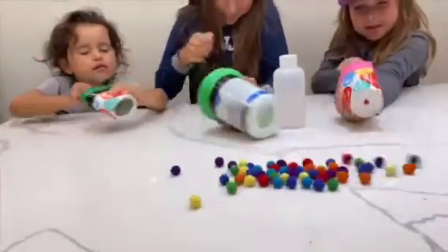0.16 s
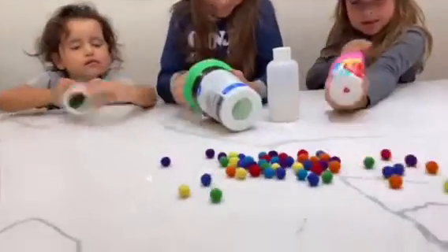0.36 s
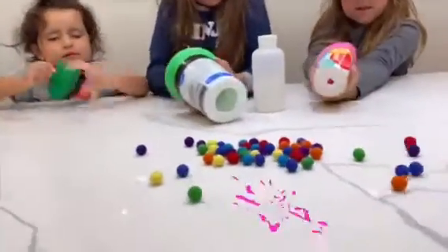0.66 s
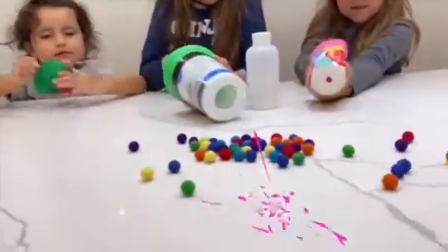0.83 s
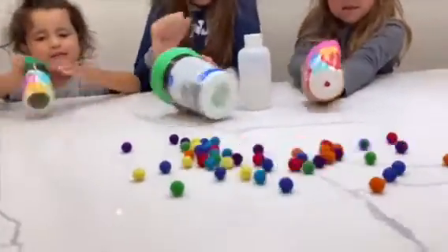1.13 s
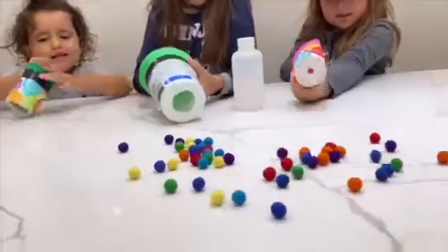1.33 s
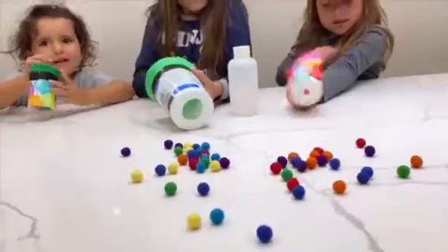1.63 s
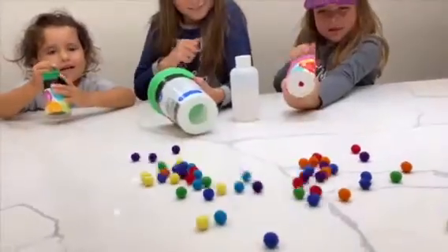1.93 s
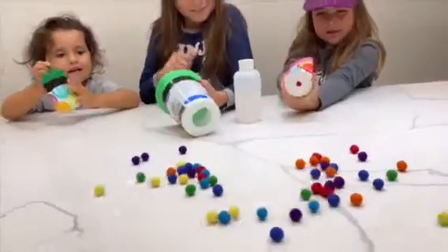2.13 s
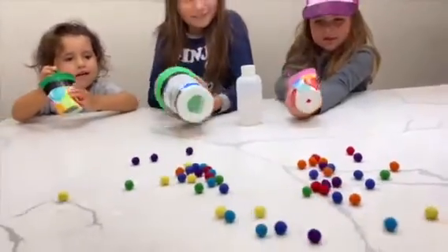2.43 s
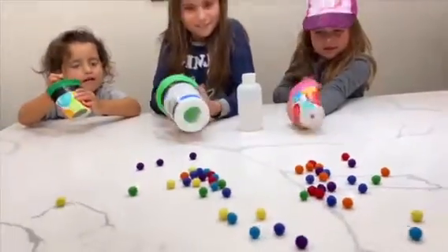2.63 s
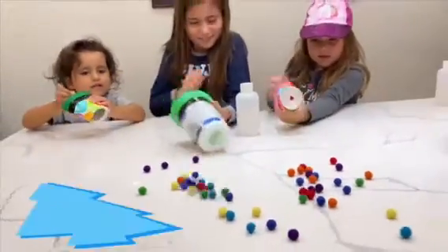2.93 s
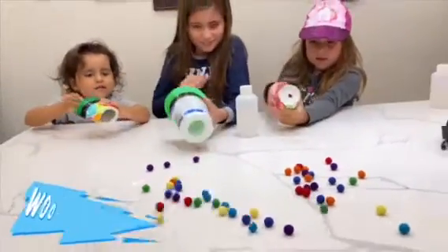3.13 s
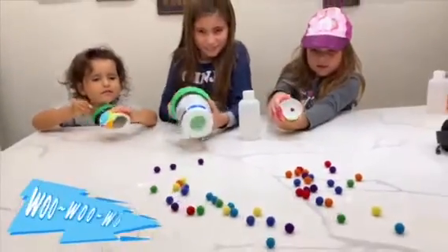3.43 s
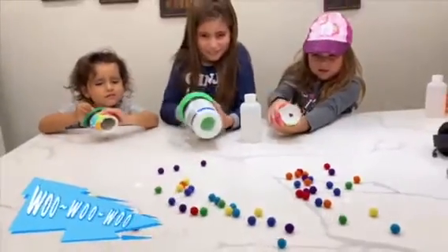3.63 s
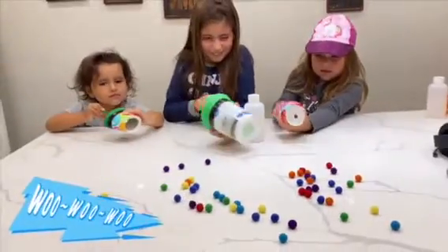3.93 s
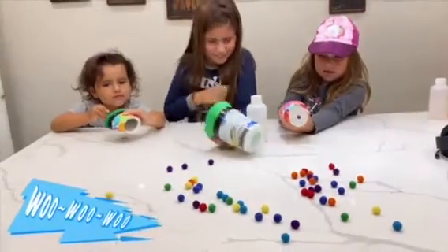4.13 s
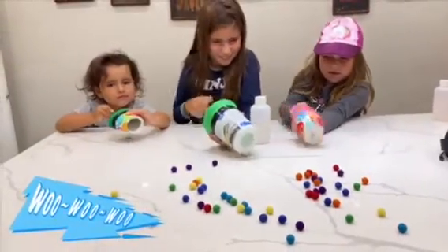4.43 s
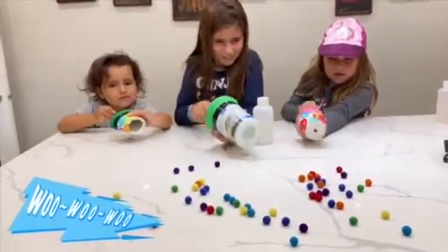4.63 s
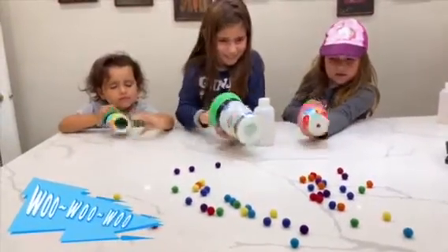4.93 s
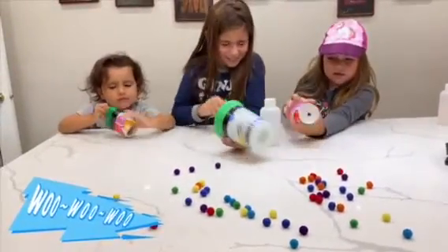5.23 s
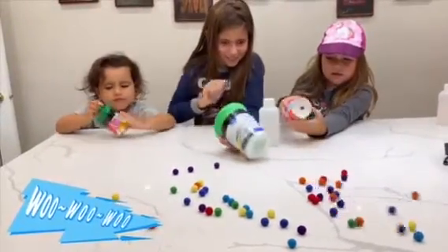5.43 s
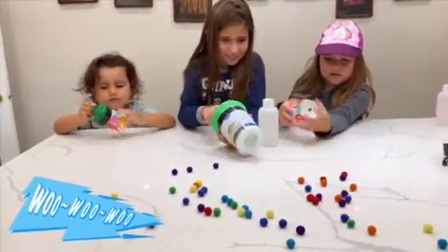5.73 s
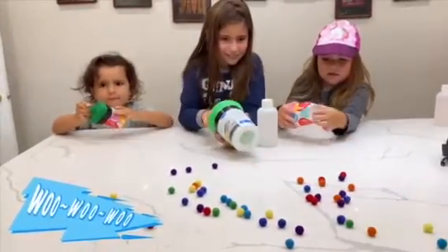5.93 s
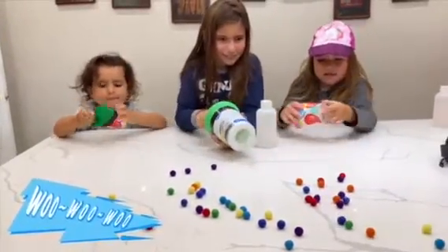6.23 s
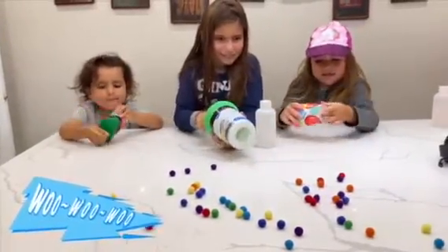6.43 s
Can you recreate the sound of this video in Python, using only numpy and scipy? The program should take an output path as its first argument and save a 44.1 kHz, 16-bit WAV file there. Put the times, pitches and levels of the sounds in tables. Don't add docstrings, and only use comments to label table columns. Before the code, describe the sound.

Close, slightly overloaded phone pickup in a reverberant kitchen with a low steady hum. The tail of a jar snap opens, then a dull cup snap at 0.15 s and a softer one at 0.3, followed by cup knocks and a rubbery grip. The big jar, towards the left, slaps with a hollow pop and table thump at 0.9, 1.7, 2.8 (lowest), 4.0 (loudest) and 5.15 s (highest, thinner). Tighter cup snaps fall at 1.5, bright, and 2.5, loud; a slack, muffled pull at 3.8; a soft full one at 4.35 and a loud one at 4.6. Finger flicks and faint rubber rustle sit between, with a stronger flick at 4.7. Cups clatter on stone from 4.8 to 5.1. After the last snap, ringing fades in about half a second, leaving small flicks, rustles and a light knock at 6.3.

```python
import sys
import numpy as np
from scipy import signal
from scipy.fft import rfft, irfft, next_fast_len
from scipy.io import wavfile
from scipy.ndimage import uniform_filter1d

SR = 44100
rng = np.random.default_rng(int(sys.argv[2]) if len(sys.argv) > 2 else 0)


def wav_out(sig):
    wavfile.write(sys.argv[1], SR, np.round(np.clip(np.atleast_2d(sig).T, -1, 1) * 32767).astype(np.int16))


def gain_from_db(level_db):
    decades = np.asarray(level_db, float) / 20
    return 10 ** decades


N = 289880
LEAD = 4096

# (time [s], peak level [dB], air ring [Hz], crack [dB], belly [dB])
JAR_SNAPS = [
    (0.908, 1, 425, -13, -10),
    (1.712, 2, 457, -14.5, -12),
    (2.805, 2.5, 356, -12.5, -11),
    (3.962, 4, 611, -13.5, -13.5),
    (5.153, 2.5, 790, -12.5, -17),
]
# (time [s], peak level [dB], air ring [Hz], crack [dB], belly [dB])
CUP_SNAPS = [
    (0.145, -2.5, 545, -38, -23),
    (0.325, -11, 875, -57, -7.5),
    (1.532, -4, 832, -6, -11),
    (2.505, -0.5, 714, -14.5, -26),
    (4.344, -14, 740, -3.5, 1.5),
    (4.622, -0.5, 745, -10.5, -13.5),
]


def snaps(table, skin, drive_db, thump_db, pan_db, ring_width_hz, belly_hz, slap_s):
    # (frequency [Hz], level [dB])
    crack = [(100, -50.5), (500, -5), (1000, 22), (2000, 36.5), (4000, -62), (7000, 15.5), (11000, 7.5),
             (16000, -2)]
    out = np.zeros((3, N + LEAD))
    late_s = np.arange(8192) / SR - 0.01
    push = np.exp(-0.5 * ((late_s - 0.002) / 0.0012) ** 2)
    thump = unit(ring(np.array([push, push]), 74.4, 21.8))
    for s, peak_db, air_hz, crack_db, belly_db in table:
        slap = blow(late_s, slap_s, swish=0.016)
        body = steep(slap, air_hz, ring_width_hz)
        for hz, width_hz, db in skin:
            body = body + gain_from_db(db) * steep(slap, hz, width_hz)
        belly = unit(steep(slap, belly_hz, 0.9 * belly_hz))
        sound = unit(body) + gain_from_db(crack_db) * unit(colour(slap, crack))
        sound = sound + gain_from_db(thump_db) * thump + gain_from_db(belly_db) * belly
        add(out, s - 0.01, sound * gain_from_db(peak_db + drive_db), pan_db)
    return out[:2], out[2]


def jar_snaps():
    # (peak level [dB], air ring [Hz], crack [dB], belly [dB])
    jar_before = (-3, 639, -14.5, -2.5)
    # (frequency [Hz], width [Hz], level [dB])
    jar_skin = [(425, 240, 16), (702.6, 202, 14), (1100, 41, -31.5), (1662, 103, 6.5)]
    return snaps([(-0.015, *jar_before), *JAR_SNAPS], jar_skin, drive_db=4, thump_db=-11.5, pan_db=17.0,
                 ring_width_hz=610, belly_hz=225, slap_s=0.01)


def cup_snaps():
    # (frequency [Hz], width [Hz], level [dB])
    cup_skin = [(477, 570, -50.5), (650, 397, 1), (1048, 55, -3), (1480, 90, -18), (2250, 364, -12.5),
                (3100, 2100, -29), (4520, 170, -42)]
    # (time [s], peak level [dB], air ring [Hz], crack [dB], belly [dB])
    slack_pull = [
        (3.769, -14, 320, -59, -7.5),
    ]
    # (frequency [Hz], width [Hz], level [dB])
    slack_skin = [(716, 560, -18), (1210, 930, -14), (1750, 260, -28)]
    taut = snaps(CUP_SNAPS, cup_skin, drive_db=3, thump_db=-21, pan_db=9.0,
                 ring_width_hz=108, belly_hz=300, slap_s=0.0048)
    slack = snaps(slack_pull, slack_skin, drive_db=3, thump_db=-22.5, pan_db=3,
                  ring_width_hz=250, belly_hz=350, slap_s=0.0034)
    dull = signal.butter(6, 2010, fs=SR, output="sos")
    return [hard + signal.sosfilt(dull, soft) for hard, soft in zip(taut, slack)]


def knocks():
    # (time [s], peak level [dB], low ring [Hz], tick [dB], thud [dB])
    cup_knocks = [(0.34, -22, 1100, -1, -24), (0.499, -20.5, 872, -35, -2.5), (0.545, -18, 842, -7, -8),
                  (0.614, -27.5, 852, -3.5, -6.5), (1.109, -23.5, 685, -9.5, -27),
                  (1.164, -35, 367, -1, -26), (1.234, -11, 1096, -25, -8), (1.318, -33.5, 1090, -2, -19),
                  (2.246, -42, 1100, -54, -29), (2.289, -46, 715, -29, 11), (2.314, -27.5, 596, -59, -30),
                  (3.256, -43, 664, -51, -44), (3.935, -45, 600, -10, -14), (4.834, -9.5, 1340, -14.5, -9),
                  (4.865, -9.5, 830, -20.5, -11.5), (4.927, -10.5, 790, -15, -10.5),
                  (4.959, -21, 814, -6, -1), (5.053, -19.5, 900, -15, -9.5), (5.113, -20.5, 650, -15, -9),
                  (5.709, -38, 1040, -61, -23), (5.812, -26.5, 1080, -43, -36),
                  (6.331, -19.5, 964, -50, -14.5)]
    # (time [s], peak level [dB], high ring [Hz], tick [dB], thud [dB])
    finger_flicks = [(0.645, -11, 1630, -16, -6), (1.019, -11, 2280, -27, -34),
                     (2.38, -34.5, 3130, -18, -2), (2.403, -28.5, 3100, -14.5, -29),
                     (2.432, -34, 2340, -18, -10), (3.411, -27.5, 1640, -31.5, -6.5),
                     (3.459, -51, 1830, -40, -14), (3.622, -34.5, 2310, -20, -20.5),
                     (3.653, -32.5, 1800, -19, -1.5), (4.304, -25, 2230, -30, -19),
                     (4.704, -11, 2210, -16.5, -24), (5.829, -25, 2040, -11, -44),
                     (6.114, -29, 2350, -10.5, -20)]
    # (frequency [Hz], level [dB])
    tick_spectrum = [(1200, -43.5), (2500, -9.5), (4000, 8), (7000, 6.5), (11000, 5.5), (16000, -6.5)]
    knock_high_hz, flick_low_hz = 1375, 714
    thud_hz, slab_hz, slab_db = 330, 84.4, -11.5
    cup_q, tick_s, tick_far_db, drive_db = 5, 0.0022, -15, -0.5
    out = np.zeros((3, N + LEAD))
    late_s = np.arange(4096) / SR - 0.01
    hits = [(s, db, hz, knock_high_hz, *rest) for s, db, hz, *rest in cup_knocks]
    hits += [(s, db, flick_low_hz, hz, *rest) for s, db, hz, *rest in finger_flicks]
    for s, peak_db, low_hz, high_hz, tick_db, thud_db in hits:
        contact = blow(late_s, tick_s, swish=0.043)
        low, high, thud, slab = (unit(ring(ring(contact, hz, hz / cup_q), hz, hz / 0.85))
                                 for hz in (low_hz, high_hz, thud_hz, slab_hz))
        tick = unit(colour(contact, tick_spectrum)) * gain_from_db([[0], [tick_far_db]])
        sound = low + gain_from_db(0.84 * tick_db + 6.5) * high + gain_from_db(tick_db + 4.0) * tick
        sound = sound + gain_from_db(thud_db) * (thud + gain_from_db(slab_db) * slab)
        add(out, s - 0.0085, sound * gain_from_db(peak_db + drive_db), pan_db=1.2)
    return out[:2], out[2]


def rustle():
    # (start [s], length [s], level [dB], treble [dB])
    grips = [(0.4, 0.062, -25.5, -14), (0.875, 0.02, -36, -9), (1.377, 0.14, -42.5, -6.5),
             (2.377, 0.082, -47, -3), (3.34, 0.13, -53, -3.5), (3.467, 0.35, -47, -6),
             (4.51, 0.03, -64, -5), (5.796, 0.014, -35, -7), (5.993, 0.024, -38, -4.5),
             (6.081, 0.054, -42.5, -2.5), (6.299, 0.027, -34.5, -8.5), (6.36, 0.095, -47, -24)]
    # (frequency [Hz], width [Hz], level [dB])
    rustle_modes = [(705, 280, 19.5), (1100, 470, 10.5), (1750, 180, -15)]
    # (frequency [Hz], level [dB])
    scuff = [(1000, -75), (1750, 4.5), (2450, 5), (3000, -7.5), (4400, -5), (7000, -13), (11000, -18.5),
             (16000, -32.5)]
    attack_s, release_s = 0.01, 0.03
    whip_s, whip_db, whip_treble_db = 0.0013, 5, 7
    t = (np.arange(N + LEAD) - LEAD) / SR
    sparse = rng.random(len(t)) < 0.06
    slips = rng.standard_normal(len(t)) * sparse * gain_from_db(2.5 * rng.exponential(size=len(t)))
    low = sum(gain_from_db(db) * ring(ring(slips, hz, w), hz, 3 * w) for hz, w, db in rustle_modes)
    high = colour(slips, scuff)
    low, high = low / low.std(), high / high.std()
    out = np.zeros(len(t))
    for s, length_s, db, treble_db in grips:
        fade = np.exp(-np.maximum(t - s - length_s, 0) / release_s)
        grip = np.clip((t - s) / attack_s, 0, 1) * fade
        out += grip * gain_from_db(db) * (low + gain_from_db(treble_db) * high)
    for s, peak_db, _, crack_db, _ in JAR_SNAPS + CUP_SNAPS:
        whip = (t < s) * np.exp(np.minimum(t - s, 0) / whip_s)
        out += whip * gain_from_db(peak_db + whip_db) * (low + gain_from_db(crack_db + whip_treble_db) * high)
    return np.array([out, out]) * gain_from_db(-1.5)


def blow(late_s, lasts_s, swish):
    envelope = np.where(late_s < 0, swish * np.exp(late_s / 0.011), np.exp(-late_s / lasts_s))
    burst = rng.standard_normal(len(late_s)) * envelope
    click = 0.3 * burst
    click[np.argmin(np.abs(late_s))] = np.sqrt(np.sum(burst ** 2))
    return np.array([burst, click])


def ring(x, hz, width_hz):
    return signal.lfilter(*signal.iirpeak(hz, hz / width_hz, fs=SR), x)


def steep(x, hz, width_hz):
    return ring(ring(x, hz, width_hz), hz, 4 * width_hz)


def on_log(hz, table, col=1):
    rows = np.array(table, float)
    return np.interp(np.log(np.maximum(hz, 1)), np.log(rows[:, 0]), rows[:, col])


def colour(x, table):
    gain = gain_from_db(on_log(np.fft.rfftfreq(x.shape[-1], 1 / SR), table))
    return irfft(rfft(x) * gain, x.shape[-1])


def unit(x):
    even = x * np.sqrt(np.sum(x[0] ** 2) / np.sum(x ** 2, axis=1, keepdims=True))
    return even / np.sqrt(uniform_filter1d(x[0] ** 2, size=128).max())


def add(out, s, sounds, pan_db):
    i = int(s * SR) + LEAD
    gains = gain_from_db([[pan_db / 2], [-pan_db / 2], [0]])
    part = (sounds[[0, 0, 1]] * gains)[:, :out.shape[1] - i]
    out[:, i:i + part.shape[1]] += part


def kitchen(direct, feed, wet_db):
    # (frequency [Hz], level [dB], decay time to -60 dB [s])
    room = [(59.4, -4, 0.44), (120, 6.5, 0.51), (346, 2, 0.55), (747, 2.5, 0.61), (1390, -2, 0.61),
            (3000, 6.5, 0.59), (6500, 7.5, 0.63), (13060, 15.5, 0.37)]
    early_db, early_s, first_wall_s = -1.5, 0.036, 0.0023
    t, hz = np.arange(SR) / SR, np.fft.rfftfreq(SR, 1 / SR)
    echoes, tail = rfft(pair(SR)), 0
    for centre_hz in 40 * 2 ** np.arange(0, 9.5, 0.5):
        share = np.clip(1 - 2 * np.abs(np.log2(np.maximum(hz, 1) / centre_hz)), 0, 1)
        fade = gain_from_db(on_log(centre_hz, room) - 60 * t / on_log(centre_hz, room, col=2))
        tail = tail + irfft(echoes * share, SR) * fade
    tail = tail * (1 - np.exp(-(t / first_wall_s) ** 2)) * gain_from_db(wet_db - 32)
    tail = tail * (1 + gain_from_db(early_db) * np.exp(-t / early_s))
    return direct + signal.fftconvolve(feed[None], tail, axes=1)[:, :len(feed)]


def pair(size):
    # (frequency [Hz], likeness [-1..1])
    likeness = [(60, 0.74), (150, 0.81), (300, 0.62), (600, 0.11), (2000, 0.014), (5000, 0.052),
                (12000, 0.14)]
    like = np.clip(on_log(np.fft.rfftfreq(size, 1 / SR), likeness), -1, 1)
    mid, side = rfft(rng.standard_normal((2, size))) * np.sqrt([(1 + like) / 2, (1 - like) / 2])
    return irfft(np.array([mid + side, mid - side]), size)


def house():
    # (frequency [Hz], density [dB per Hz])
    house_spectrum = [(24, -25.5), (40, -9), (345, -19.5), (529, -16), (1440, -31), (4130, -45.5),
                      (11000, -46.5), (16000, -37)]
    noise = colour(pair(N + LEAD), house_spectrum)
    return noise / noise.std() * gain_from_db(-46)


def scene():
    fingers = rustle()
    mix = kitchen(*jar_snaps(), wet_db=-4)
    mix = mix + kitchen(*cup_snaps(), wet_db=0)
    mix = mix + kitchen(*knocks(), wet_db=-1)
    mix = mix + kitchen(fingers, fingers[0], wet_db=-2.5)
    return (mix + house())[:, LEAD:]


def ports(x):
    same_below_hz, shared_above_hz = 210, 6200
    in_step_hz, full_turn_hz, stepping = 6850, 4300, 0.09
    size = next_fast_len(N + LEAD)
    hz = np.fft.rfftfreq(size, 1 / SR)
    left, right = rfft(x, size)
    same = (left - right) / 2 / (1 + (hz / same_below_hz) ** 2)
    left, right = left - 0.3 * same, right + 0.9 * same
    turn = 2 * np.pi * (hz - in_step_hz) / full_turn_hz
    turn -= stepping * np.sin(2 * turn) / 2
    share = np.clip((hz - shared_above_hz) / 800 + 0.5, 0, 1)
    right = np.sqrt(1 - share ** 2) * right + share * left * np.exp(1j * turn)
    return irfft(np.array([left, right]), size)[:, :N]


def band_limit(x):
    return signal.sosfilt(signal.butter(12, 16440, fs=SR, output="sos"), x)


def record(dry):
    bass_cut = signal.butter(2, 40, "high", fs=SR, output="sos")
    top_cut = signal.ellip(8, 0.2, 50, 15900, fs=SR, output="sos")
    near = ports(signal.sosfilt(np.vstack([bass_cut, top_cut]), dry))
    knee = 12
    return band_limit(near / (1 + np.abs(near) ** knee) ** (1 / knee))


dry = scene()
out = record(dry)
wav_out(out)
```